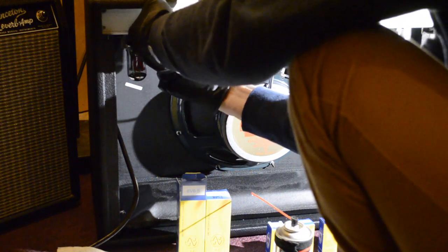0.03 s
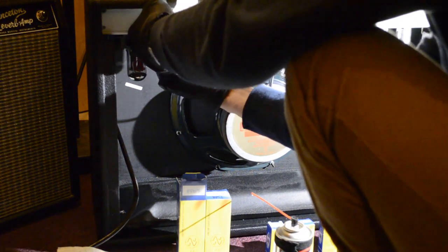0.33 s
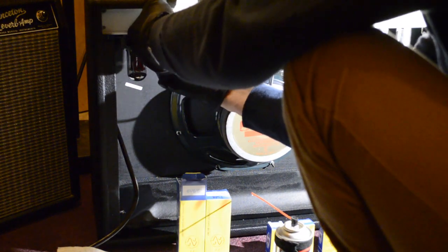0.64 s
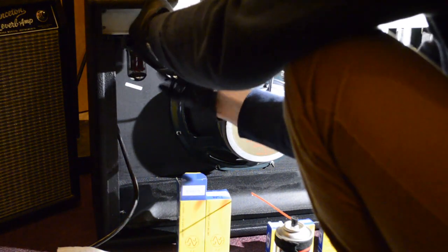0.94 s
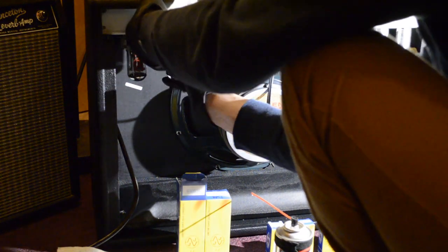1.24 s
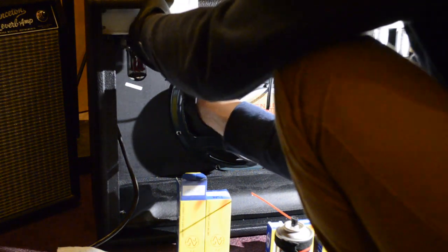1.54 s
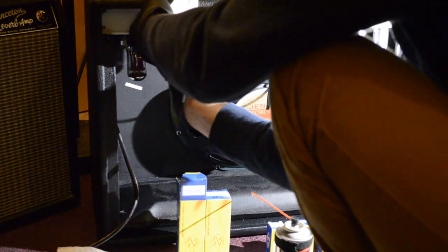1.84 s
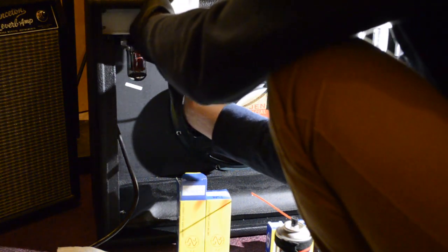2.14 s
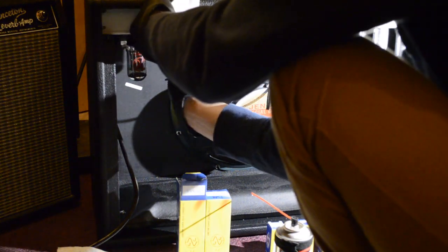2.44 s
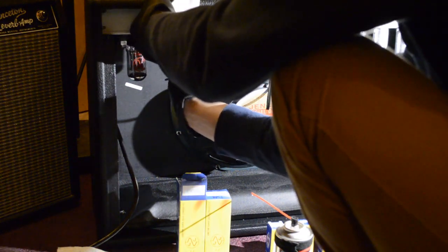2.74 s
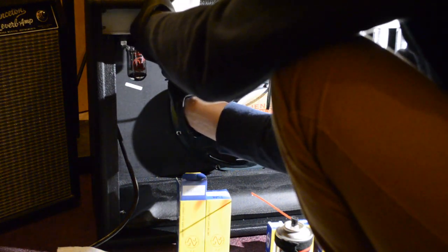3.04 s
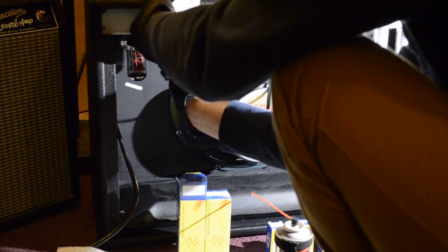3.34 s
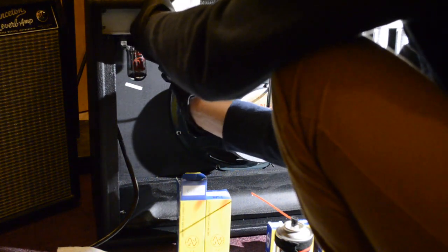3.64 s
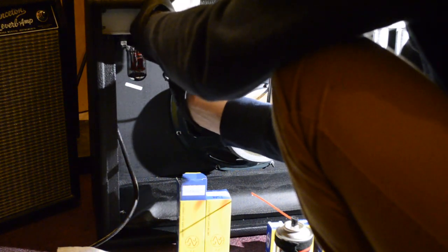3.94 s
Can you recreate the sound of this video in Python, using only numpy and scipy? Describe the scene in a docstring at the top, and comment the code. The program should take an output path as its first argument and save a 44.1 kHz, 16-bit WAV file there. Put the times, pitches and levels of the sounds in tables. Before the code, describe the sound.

A guitar amplifier crackles and pops faintly over a low hum and rumble.

```python
"""A valve guitar amplifier idles while someone works inside its open back.
A bad contact sputters through the speaker: a dense crackle of tiny one-sided sparks and now and then a dry pop.
A faint microphonic note rings along, over mains hum, hiss and a low room rumble."""
import sys
import numpy as np
from scipy import signal
from scipy.fft import rfft, irfft
from scipy.io import wavfile

SR = 44100
rng = np.random.default_rng(int(sys.argv[2]) if len(sys.argv) > 2 else 0)


def generate_wav(sig):
    """Save sig (samples, or channels by samples) to the path in sys.argv[1] as 16-bit PCM at SR."""
    pcm = np.round(np.clip(np.atleast_2d(sig).T, -1, 1) * 32767).astype(np.int16)
    wavfile.write(sys.argv[1], SR, pcm)


N = 176400

# the pops that stand out: (s, peak dB, length ms)
POPS = [(0.0479, -37, 0.13), (0.1159, -37.5, 0.12), (0.2214, -35.0, 0.13), (0.2512, -32, 0.12),
        (0.2653, -37, 0.082), (0.2912, -32.5, 0.15), (0.349, -22.5, 0.23), (0.3622, -30.5, 0.11),
        (0.5317, -38.5, 0.084), (0.5922, -38.0, 0.15), (0.727, -37.5, 0.1), (0.864, -38.5, 0.15),
        (0.9363, -36.5, 0.12), (0.9523, -35.5, 0.13), (1.1754, -39.5, 0.15), (1.218, -27.0, 0.15),
        (1.2962, -31, 0.15), (1.3594, -34.5, 0.13), (1.3753, -34, 0.14), (1.3769, -21.0, 0.32),
        (1.3923, -36.5, 0.15), (1.575, -37, 0.12), (1.6531, -38, 0.091), (1.7287, -12, 0.32),
        (1.7289, -15, 0.1), (1.7328, -42, 0.1), (1.7762, -36.5, 0.16), (1.8616, -36, 0.15),
        (1.9668, -39.5, 0.14), (2.1231, -39.5, 0.15), (2.1502, -24, 0.24), (2.3547, -33.5, 0.11),
        (2.3923, -32.5, 0.18), (2.4205, -39.5, 0.16), (2.695, -37, 0.14), (2.7511, -35, 0.078),
        (2.7799, -38.5, 0.11), (3.0258, -39.5, 0.14), (3.1737, -20.5, 0.18), (3.4645, -40, 0.14),
        (3.5288, -12.0, 0.51), (3.576, -34.0, 0.17), (3.5843, -36, 0.13), (3.6178, -38.5, 0.091),
        (3.626, -35.0, 0.11), (3.6971, -39, 0.15), (3.8284, -38, 0.15), (3.919, -38.5, 0.12),
        (3.9509, -24.5, 0.2), (3.9732, -35, 0.13)]
POP_DB = 0.0
RISE_MS, SKEW = 0.23, 1.47   # the current builds up, levels off in a long spark, then breaks
KICK_SHARE, KICK_MS, KICK_AT_MS = 0.32, 0.18, 0.25   # reverse kick at the break: share, decay, for a spark this long
# the fine crackle: how busy the contact is, as level of the treble (s, dB)
ACTIVITY = [(0.0, -70.5), (0.11, -71), (0.27, -69), (0.75, -71), (0.95, -74), (1.27, -75), (1.43, -73), (1.63, -72.5),
            (1.96, -71), (2.26, -71.5), (2.52, -74), (2.96, -71.5), (3.11, -74), (4.0, -70)]
SPARKS_PER_S, RATE_FOLLOWS, CLUMP_DB, CLUMPS_PER_S = 1500, 1.2, 2.0, 30
SMALLEST_DB, LARGEST_DB, SIZE_SPREAD_DB = -70, -40.5, 8.5   # small sparks are far commoner than large ones
CRACKLE_LENGTH_MS, REVERSED_SHARE, CRACKLE_DB = 0.093, .17, -0.5
# the speaker: treble and bass limits, level
TREBLE_HZ, BASS_HZ, OUTPUT_DB = 11060, 57.7, .5
# microphonic modes: (Hz, gain dB, t60 s)
MODES_RUNG = [(829, -58, 0.098), (320, -62.5, 0.1)]
RING_HZ, RING_T60_S, RING_DB = 827, 0.15, -78
# the note swells: (s, dB)
RING_SWELLS = [(0.461, 6), (3.22, 8.5)]
SWELL_S = 0.064
# mains hum: (Hz, dB rms)
HUM = [(60, -57), (120, -60), (180, -82)]
# room rumble and amplifier hiss: (Hz, dB per Hz)
RUMBLE = [(12, 0.5), (20, 5.5), (45, -1), (80, 0.5), (110, -3.5), (150, -12.5), (220, -17.5), (320, -24.5), (450, -33), (900, -47), (2000, -58)]
RUMBLE_DB = -52
HISS = [(200, 6), (700, 1.5), (2000, -4.5), (5000, -12.5), (9000, -11.5), (16000, -7)]
HISS_DB = -78.5
# brief dull swells in the low middle: (s, dB rms)
LOW_SWELLS = [(.84, -60.5), (2.65, -58)]
LOW_SWELL_BAND, LOW_SWELL_S = [(90, -1), (150, 7.5), (220, -3), (330, -19.5), (600, -44)], 0.073
CUTOFF_HZ = 16200   # fixed
T = np.arange(N) / SR


def from_db(db):
    """Decibels to gain."""
    return 10 ** (np.asarray(db) / 20)


def rms_one(x):
    """Scale to unit power."""
    return x / np.sqrt(np.mean(x ** 2) + 1e-20)


def passed(x, hz, kind, order=2):
    """Butterworth low-pass or high-pass."""
    return signal.sosfilt(signal.butter(order, min(hz, .45 * SR), kind, fs=SR, output="sos"), x + 1e-18)


def noise(spectrum):
    """Steady noise of a given colour; rms 1."""
    hz, db = np.transpose(spectrum)
    f = np.maximum(np.arange(N // 2 + 1) * SR / N, 1)
    gain = from_db(np.interp(np.log(f), np.log(hz), db)) * (f > 10)
    return rms_one(irfft(rfft(rng.standard_normal(N)) * gain, N))


def drift(rate):
    """Slow chance; spread 1."""
    return rms_one(passed(rng.standard_normal(N + SR), rate, "low")[SR:])


def ring(x, hz, t60):
    """A unit click sets a sine of height 1 ringing."""
    r, w = from_db(-60 / (t60 * SR)), 2 * np.pi * hz / SR   # fixed
    return signal.lfilter([0, np.sin(w)], [1, -2 * r * np.cos(w), r * r], x + 1e-18)


def swell(s, width_s):
    """A smooth rise and fall around one moment."""
    return np.exp(-.5 * ((T - s) / width_s) ** 2)


def spark(length_ms):
    """One lopsided arch of current, of height 1, and the kick that follows its break."""
    ms = (np.arange(96)[:, None] + np.linspace(0, 1, 10)) * 1000 / SR   # fixed
    drive = length_ms / RISE_MS
    arch = np.tanh(drive * np.sin(np.pi * np.minimum(ms / length_ms, 1) ** SKEW)) / np.tanh(drive)
    kick = (ms > length_ms) * np.exp(-np.abs(ms - length_ms) / KICK_MS)
    return (arch - KICK_SHARE * np.sqrt(length_ms / KICK_AT_MS) * kick).mean(axis=1)


def pops():
    """Single large sparks; the longer ones sound fuller."""
    out = np.zeros(N + SR)
    for s, db, length_ms in POPS:
        pulse = from_db(db + POP_DB) * spark(length_ms)
        start = max(int(s * SR) - np.argmax(pulse), 0)
        out[start:start + len(pulse)] += pulse
    return out[:N]


def crackle():
    """Tiny sparks at random, mostly of one polarity, thicker when the contact is busy."""
    s, db = np.transpose(ACTIVITY)
    busy_db = RATE_FOLLOWS * np.interp(T, s, db - db.mean()) + CLUMP_DB * drift(CLUMPS_PER_S)
    born = rng.random(N) < SPARKS_PER_S * from_db(busy_db) / SR
    size_db = SMALLEST_DB + SIZE_SPREAD_DB * rng.exponential(1, N)
    sign = np.where(rng.random(N) < REVERSED_SHARE, -1, 1)
    clicks = born * (size_db < LARGEST_DB) * sign * from_db(size_db + CRACKLE_DB)
    return np.convolve(clicks, spark(CRACKLE_LENGTH_MS))[:N]


def speaker(current):
    """Edges are rounded, and the cone swings back slowly after a pop."""
    return from_db(OUTPUT_DB) * passed(passed(current, TREBLE_HZ, "low"), BASS_HZ, "high")


def microphonics(sparks):
    """Modes rung by the sparks, and the main one wavering faintly by itself."""
    struck = sum(from_db(db) * ring(sparks, hz, t60) for hz, db, t60 in MODES_RUNG)
    level_db = RING_DB + sum(db * swell(s, SWELL_S) for s, db in RING_SWELLS)
    return struck + from_db(level_db) * rms_one(ring(rng.standard_normal(N + SR), RING_HZ, RING_T60_S)[SR:])


def hum():
    """Mains frequency and its multiples."""
    return sum(from_db(db) * np.sqrt(2) * np.sin(2 * np.pi * (hz * T + rng.random())) for hz, db in HUM)


def background():
    """Room rumble with its brief swells, and the amplifier's hiss."""
    swells = sum(from_db(db) * swell(s, LOW_SWELL_S) for s, db in LOW_SWELLS) * noise(LOW_SWELL_BAND)
    return from_db(RUMBLE_DB) * noise(RUMBLE) + swells + from_db(HISS_DB) * noise(HISS)


def scene():
    """Everything, close and dry, in one channel."""
    sparks = speaker(pops() + crackle())
    return (sparks + microphonics(sparks) + hum() + background())[None]


def record(dry):
    """The top is cut steeply."""
    return signal.sosfilt(signal.ellip(8, .1, 70, CUTOFF_HZ, fs=SR, output="sos"), dry)   # fixed


dry = scene()
out = record(dry)
generate_wav(out)
```